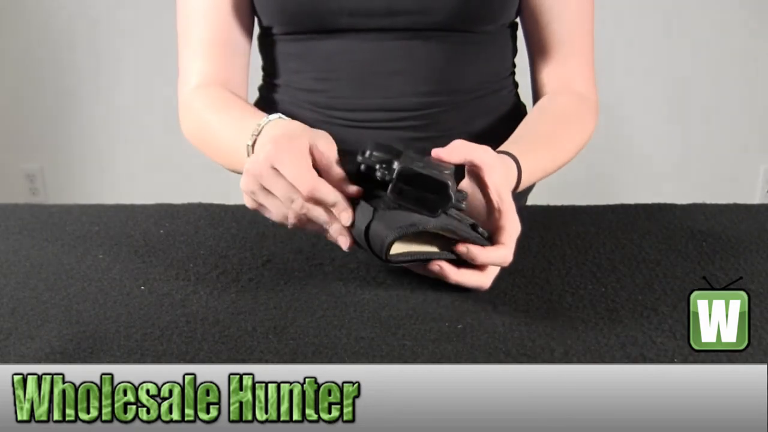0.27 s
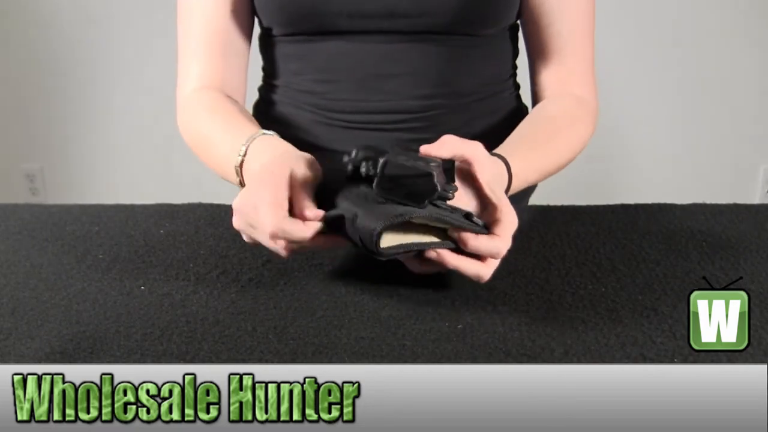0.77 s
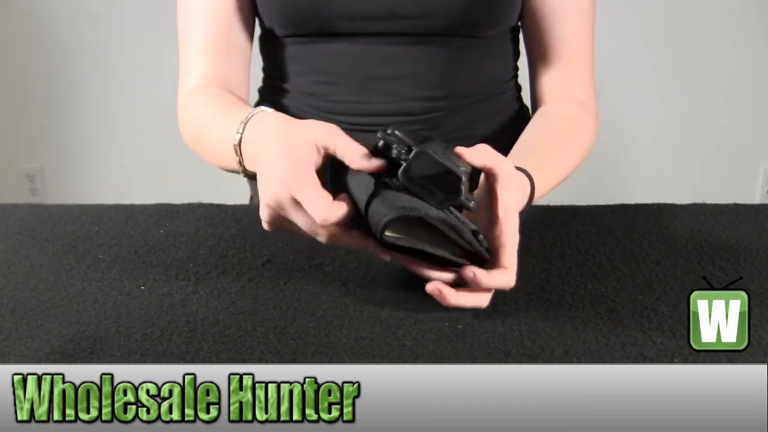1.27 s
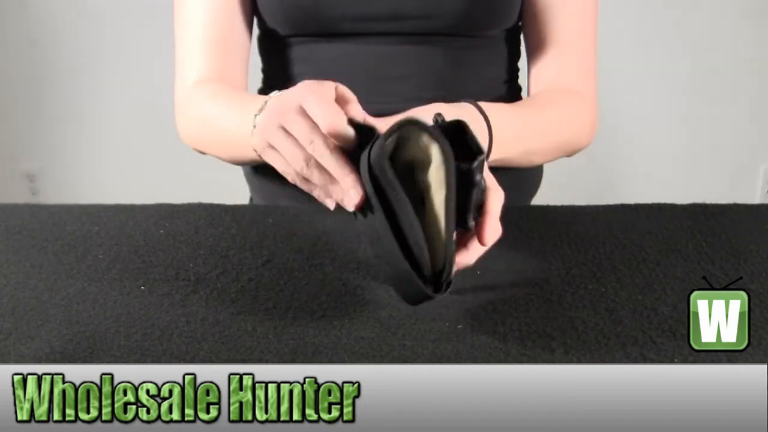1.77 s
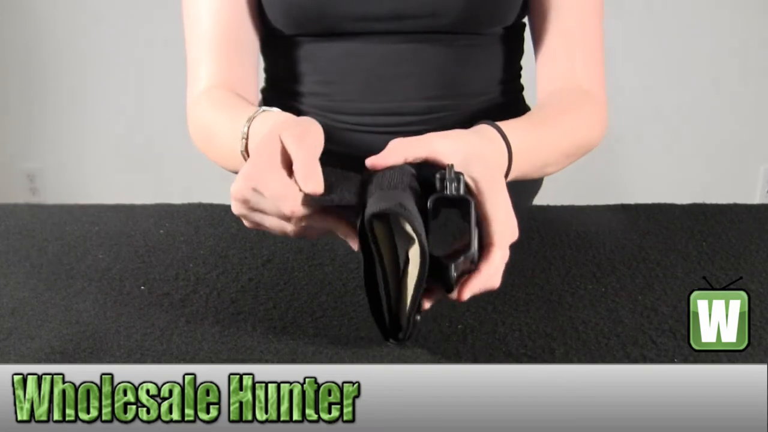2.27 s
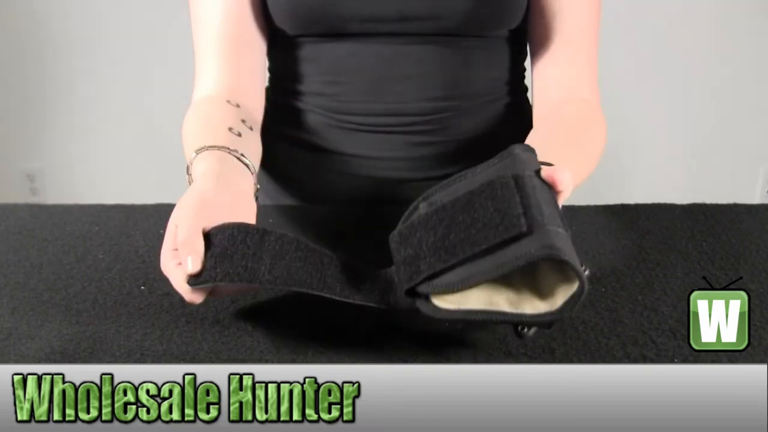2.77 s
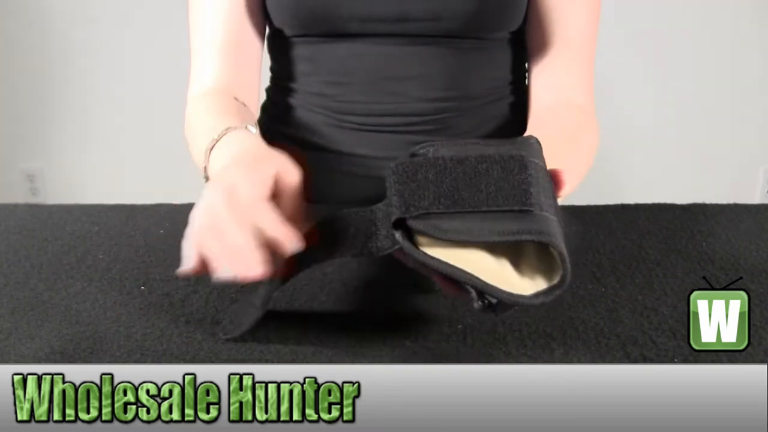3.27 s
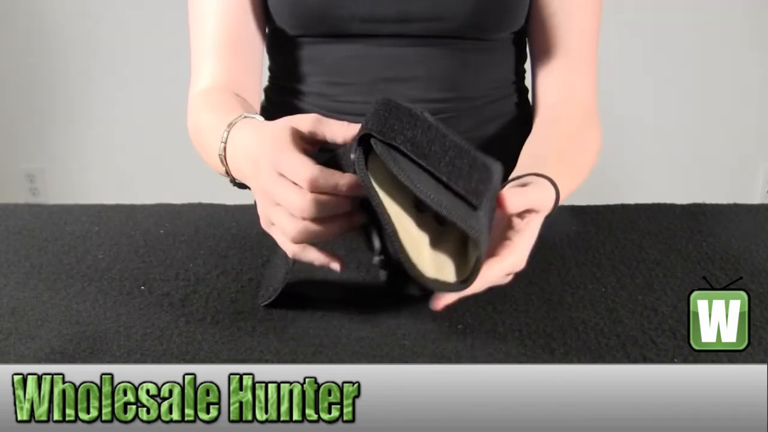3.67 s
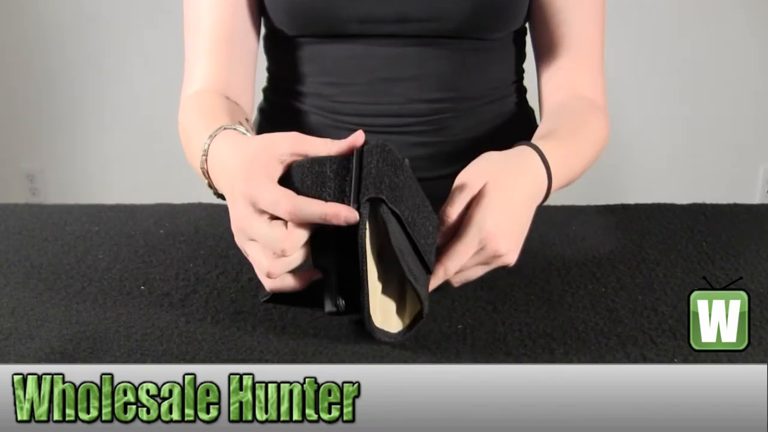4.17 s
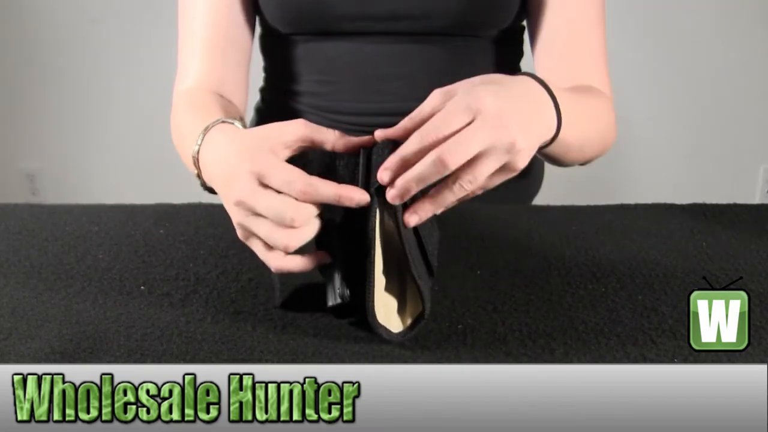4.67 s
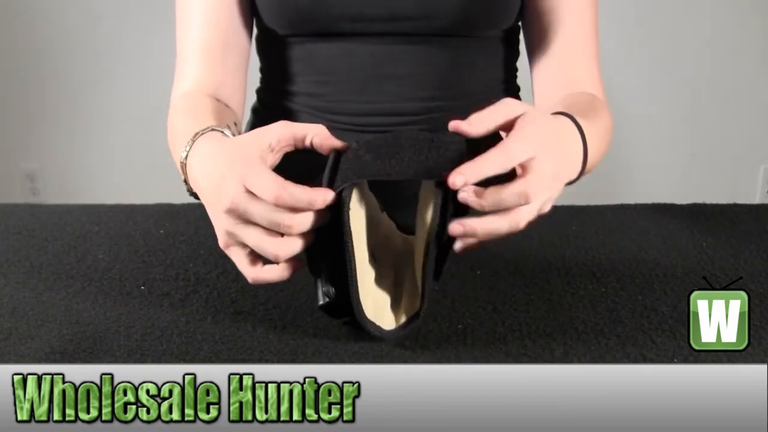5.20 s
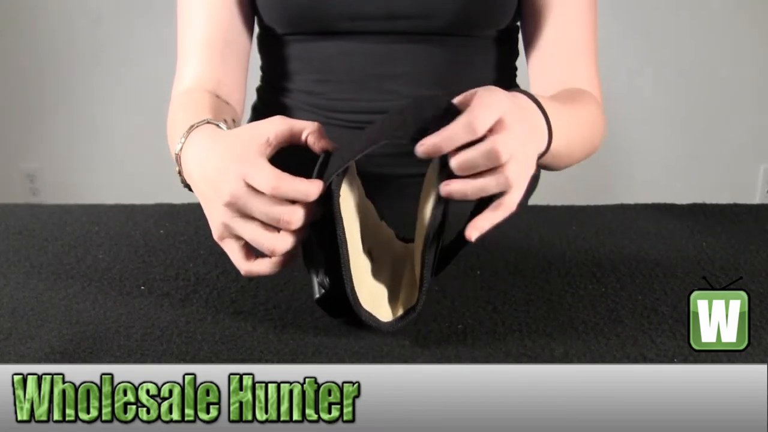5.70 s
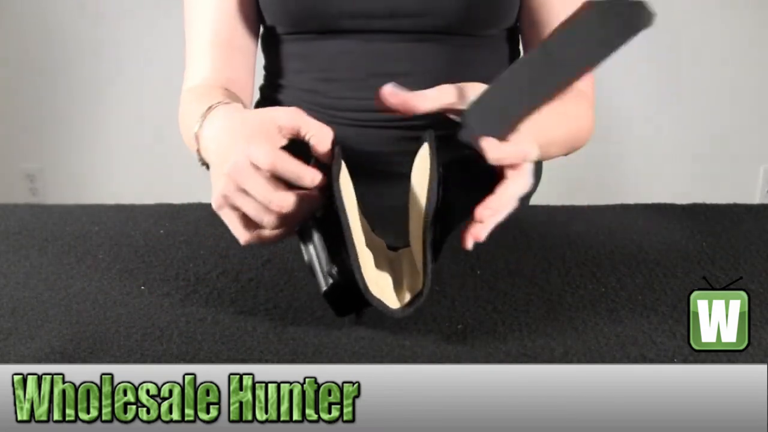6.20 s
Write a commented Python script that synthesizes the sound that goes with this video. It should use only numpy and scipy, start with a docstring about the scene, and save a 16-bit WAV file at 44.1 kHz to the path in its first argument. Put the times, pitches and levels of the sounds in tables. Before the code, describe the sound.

In a small bare room, fabric fastening rips open in two crisp bursts, followed by soft handling, plastic clacks and two raspy strap pulls.

```python
"""Peeling a hook-and-loop strap

Hands open a padded fabric brace over a table in a small, bare room. Its strap is peeled in two pulls:
single hooks and whole patches let go as short bursts of coloured noise. The brace is turned over: cloth
rustles as swelling noise, padding bumps, and plastic fittings knock with dying sine tones. The strap is drawn
out through its ring in two strokes of rasping, hissing noise, while the table booms on one low wavering tone."""
import sys
import numpy as np
from scipy import signal
from scipy.fft import rfft, irfft, next_fast_len
from scipy.io import wavfile
from scipy.ndimage import map_coordinates

SR = 44100
rng = np.random.default_rng(int(sys.argv[2]) if len(sys.argv) > 2 else 0)


def unload_audio(sound):
    """Save the sound as a 16-bit wav file, at the path given as the first command line argument."""
    columns = np.transpose(np.atleast_2d(sound))
    # keep every value between -1 and 1, then stretch to whole-number steps
    steps = np.round(np.clip(columns, -1, 1) * 32767)
    wavfile.write(sys.argv[1], SR, steps.astype(np.int16))


N = 284180  # length of the scene in samples

# Hands sliding on the cloth. Each row: start in seconds, length in seconds,
# relative level of the dull rub in dB, relative level of the light brush in dB.
SLIDES = [(0.0, 0.1, -46.5, -35.5), (0.158, 0.13, -43.5, -47.5), (0.294, 0.088, -44, -31.5),
          (0.448, 0.055, -32, -35.5), (1.303, 0.048, -52.5, -43.5), (1.378, 0.097, -38, -40),
          (1.481, 0.05, -32, -33), (1.673, 0.1, -44, -61), (1.913, 0.0564, -41.5, -60),
          (3.195, 0.15, -40, -39), (3.388, 0.06, -40, -39), (3.489, 0.39, -45, -49.5),
          (3.627, 0.26, -39, -43.5), (3.883, 0.093, -33.5, -40.5), (3.993, 0.38, -43, -49),
          (4.181, 0.3, -43, -53.5), (4.396, 0.065, -39.5, -40.5), (4.58, 0.034, -39.5, -45.5),
          (4.617, 0.33, -39, -49), (5.445, 0.19, -48.5, -72), (6.081, 0.04, -57, -33.5),
          (6.162, 0.071, -32.5, -45.5), (6.308, 0.24, -39.5, -43.5)]
# Colour of a hard little click. Each row: frequency in Hz, level in dB.
CLICK_COLOUR = [(300, -5.5), (600, 1.5), (900, -5), (1300, 0), (1800, -2), (2400, -5.5), (3100, -4),
                (4200, -14.5), (5800, -10.5), (10000, -20)]


def snaps():
    """Single sharp snaps of hooks, most during the pulls, a few faint ones before and after."""
    # Each row: time in seconds, energy of the tick in dB, energy of the fabric's body in dB.
    single_hooks = [(0.201, -10.5, -15), (0.3752, -8.5, -11.5), (0.5742, -2.5, -7), (0.6286, 4.5, 3),
                    (0.647, 1.5, 3), (0.6603, 4.5, 2), (0.6647, 5, 1), (0.6725, 6, 1.5), (0.6804, -3.5, 1),
                    (0.687, 1, -3), (0.758, 6, 4), (0.7613, 3, -5), (0.7794, -7, 4), (0.7937, 4, 1),
                    (0.8199, 5, 2.5), (0.8278, 3, 3.5), (0.8657, 6, 5.5), (0.9356, 5, 7.5),
                    (0.9615, -16, 8), (1.494, -15, 2.5), (1.505, -14, -1), (1.5263, 0.5, 7),
                    (1.5373, -0.5, 4.5), (1.5527, 5, 5.5), (1.6434, 1.5, 2), (1.8088, 0, 5.5),
                    (1.8119, 6, 5), (1.9392, -14.5, -13), (2.0094, 1, 2.5), (2.0264, 0, 3.5),
                    (2.032, 1, 6.5), (2.1388, 3.5, 10.5), (2.162, 5, 3), (2.2549, 3.5, -1), (2.3164, 8, -4),
                    (2.322, 2.5, -11), (2.4076, -9, 0), (2.442, -1, 2.5), (2.4543, 11, -2), (2.526, 0, 4.5),
                    (3.859, -18, -13), (4.3605, -11.5, -13), (6.119, -7, -15.5)]
    times, tick_db, body_db = np.transpose(single_hooks)
    return hooks(times, amp(tick_db), amp(body_db))


def tears(hooks_per_second=300, spread_db=1.0, growth_db=1.0):
    """Each hook that lets go overloads its neighbours, so a patch goes in one slightly growing rush."""
    # Each row: start in seconds, length in seconds, level of the ticks in dB, level of the body in dB.
    patches = [(0.705, 0.014, -17, -18.5), (0.827, 0.019, -14, -15.5), (0.872, 0.02, -17, -19),
               (0.897, 0.041, -19.5, -19), (0.944, 0.028, -27, -26), (1.029, 0.01116, -24, -20),
               (2.126, 0.0076, -20.5, -20.5), (2.143, 0.014, -17.5, -16), (2.178, 0.018, -21.5, -19),
               (2.207, 0.032, -19, -19), (2.278, 0.012, -24, -22), (2.286, 0.018, -17, -17),
               (2.364, 0.0096, -18.5, -18), (2.426, 0.0086, -19, -21.5), (2.457, 0.07, -20.5, -20.5)]
    rows = []
    for start, length, tick_db, body_db in patches:
        count = max(2, round(length * hooks_per_second))
        progress = (np.arange(count) + rng.uniform(0, .8, count)) / count
        uneven = amp(spread_db * rng.standard_normal(count) + growth_db * progress)
        # longer patches hold more energy, shared out among their hooks
        share = unit(uneven) * np.sqrt(length * SR / count)
        rows.append([start + length * progress, share * amp(tick_db), share * amp(body_db)])
    return hooks(*np.hstack(rows))


def strays(strays_per_second=70, spread_db=5.5, body_db=0.5):
    """Weaker hooks let go at random all along the peeling edge."""
    # Pulls on the strap. Each row: start in seconds, end in seconds, typical energy of a hook's tick in dB.
    pulls = [(0.5, 0.541, -20), (0.758, 0.996, -9.5), (1.497, 1.594, -12.5), (2.151, 2.519, -8.5)]
    rows = []
    for start, end, db in pulls:
        count = max(2, round((end - start) * strays_per_second))
        progress = (np.arange(count) + rng.random(count)) / count
        sizes = amp(db + spread_db * rng.standard_normal(count))
        rows.append([start + (end - start) * progress, sizes])
    times, sizes = np.hstack(rows)
    return hooks(times, sizes, sizes * amp(body_db))


def hooks(times, tick, body):
    """A freed hook ticks sharply, and the fabric behind it springs back, higher in pitch when taut."""
    # How taut the strap is held. Each row: time in seconds, tautness from 0 to 1.
    tension = [(0, 0.21), (1.9, 0), (2.12, 0.78), (2.35, 1), (2.45, 0.44), (2.6, 0.9)]
    # Colours of the tick, the slack fabric and the taut fabric. Each row: frequency in Hz, level in dB.
    tick_colour = [(1500, -34), (3200, -11.5), (4300, -20), (5300, 2), (7000, -4), (8800, 2.5), (10500, 0),
                   (12500, -22)]
    slack_colour = [(40, -24), (170, -24), (500, -3.5), (750, 2.5), (1000, -1.5), (1550, 4), (2100, -2.5),
                    (2600, 0.5), (3300, 3), (4200, -12), (7000, -6)]
    taut_colour = [(40, -27), (170, -15), (500, -11), (850, -2.5), (1550, 0), (1800, -4), (2200, 1.5),
                   (2600, -5), (3200, 0), (4200, -11), (7000, -47)]
    taut = np.clip(np.interp(times, *np.transpose(tension)), 0, 1)
    ticks = bursts(times, tick, tick_colour, life=0.0006, vary=0.06)
    slack_fabric = bursts(times, body * np.sqrt(1 - taut), slack_colour, life=0.0023, vary=0.018)
    taut_fabric = bursts(times, body * np.sqrt(taut), taut_colour, life=0.0023, vary=0.018)
    return high_pass(ticks, corner_hz=1480) + high_pass(slack_fabric + taut_fabric, corner_hz=284)


def strap():
    """The weave rasps and hisses over the ring, both as strongly as it is pulled."""
    # One list for each stroke. Each row: time in seconds, strength of the pull in dB.
    strokes = [
        [(4.885, -48), (4.91, -29.5), (5.01, -26.5), (5.075, -17.5), (5.15, -23.5), (5.236, -17.5),
         (5.31, -32.5), (5.37, -29), (5.46, -69)],
        [(5.57, -62), (5.59, -31), (5.656, -25.5), (5.816, -21.5), (5.868, -26), (5.916, -17), (5.954, -35.5),
         (6.05, -63)],
    ]
    # Hiss of the weave relative to the pull, one value in dB for each stroke.
    hiss_db = [-9, -7]
    # Colours of the rasp and the hiss. Each row: frequency in Hz, level in dB.
    rasp_colour = [(71, -45), (120, -19.5), (160, -20.5), (228, -18), (394, -7.5), (569, -6.5), (673, -2.5),
                   (833, 0.5), (913, -7), (1420, -3.5), (1790, -5), (1960, -10), (3190, -5.5),
                   (4260, -19.5), (4600, -27.5), (5980, -45.5), (10100, -120)]
    hiss_colour = [(1500, -60), (3500, -25), (4600, -2.5), (5500, 3.5), (7400, -1.5), (9300, 0),
                   (11000, -1)]
    t = np.arange(N) / SR
    pull_db = [np.interp(t, *np.transpose(rows), left=-120, right=-120) for rows in strokes]
    pulls = amp(np.array(pull_db))
    rasp = amp(-5.0) * pulls.sum(axis=0) * friction(rasp_colour, grain_db=2.0)
    hiss = amp(hiss_db) @ pulls * friction(hiss_colour, grain_db=3.0)
    drag = amp(2.6 * wobble(70))  # the drag flutters
    return drag * (rasp + hiss)


def knocks(ring_t60=0.041, rise=0.00079, upper=1.11):
    """A fitting clacks and two close modes of the hollow plastic ring briefly."""
    # Each row: time in seconds, level in dB, pitch of the hollow ring in Hz, clack relative to the ring in dB.
    fittings = [(0.236, -29.5, 790, -15), (0.476, -26, 801, -13), (1.311, -36, 510, 3),
                (1.466, -22.5, 813.4, -6), (2.982, -23.5, 620, -1.5), (3.737, -24, 570, 2),
                (3.807, -36.5, 626, 8.5), (3.967, -16, 687, -12.5), (3.984, -23.5, 739, -9),
                (4.777, -39, 903, 8.5), (5.523, -43.5, 676, 5.5), (5.913, -5, 706, -26),
                (5.92, -17, 765, -1.5), (6.119, -18.5, 648, -1.5), (6.306, -22, 678, -16.5),
                (6.4, -21.5, 690, -9)]
    times, ring_db, pitch_hz, clack_db = np.transpose(fittings)
    rings = np.zeros(N + SR)
    t = np.arange(SR // 5) / SR
    envelope = amp(-60 * t / ring_t60) * (1 - np.exp(-t / rise))
    for start, db, hz in zip(times, ring_db, pitch_hz):
        modes = np.sin(2 * np.pi * hz * t) + amp(-7) * np.sin(2 * np.pi * hz * upper * t)
        rings[round(start * SR):][:len(t)] += amp(db) * modes * envelope
    # 22 dB turns a level into the energy of a burst
    clacks = bursts(times, amp(ring_db + clack_db + 22), CLICK_COLOUR, life=0.0048, vary=0.023)
    return high_pass(rings[:N] + clacks, corner_hz=260)


def handling(rise=0.23, fade=0.59):
    """Palms rub the padding and fingers brush the nylon."""
    # Colours of the dull rub and the light brush. Each row: frequency in Hz, level in dB.
    rub_colour = [(53, -51), (90, -17), (215, -8.5), (423, -3.5), (460, 0), (538, -5), (664, 3), (1170, -1),
                  (1340, -7), (1570, -0.5), (2600, -15), (3380, -17), (5720, -120)]
    brush_colour = [(200, -64), (900, -1.5), (1800, -5), (2600, -0.5), (3300, 3), (4250, -15), (5400, -2.5),
                    (7200, -7.5), (9000, -4), (11000, -6.5)]
    rub, brush = sum(amp([[rub_db], [brush_db]]) * swell(start, length, rise, fade)
                     for start, length, rub_db, brush_db in SLIDES)
    grip = amp(2.44 * wobble(45))  # the grip varies
    rubbing = amp(-4.5) * rub * friction(rub_colour, grain_db=5.5)
    brushing = amp(-0.5) * brush * friction(brush_colour, grain_db=3.5)
    return grip * (rubbing + brushing)


def creases(creases_per_second=15, over_brush_db=23, spread_db=3.5):
    """Stiff nylon ticks faintly as it bends under the sliding fingers."""
    rows = []
    for start, length, rub_db, brush_db in SLIDES:
        count = int(np.ceil(length * creases_per_second))
        times = start + length * rng.uniform(.1, .8, count)
        sizes = amp(brush_db + over_brush_db + spread_db * rng.standard_normal(count))
        rows.append([times, sizes])
    times, sizes = np.hstack(rows)
    return high_pass(bursts(times, sizes, CLICK_COLOUR, life=0.0019, vary=0.23), corner_hz=500)


def bumps():
    """Padding meets the table: a dull push with no ring."""
    # Each row: time in seconds, relative level in dB.
    soft_hits = [(1.657, -26), (1.705, -28.5), (2.43, -22.5), (2.48, -24.5), (3.389, -33), (3.45, -35.5)]
    # Colour of the push. Each row: frequency in Hz, level in dB.
    thud_colour = [(50, -37), (110, -3.5), (170, -0.5), (280, -3.5), (600, -2), (1500, -62)]
    times, db = np.transpose(soft_hits)
    thuds = bursts(times, amp(db + 14), thud_colour, life=0.027, vary=0.099, size=4096)
    return high_pass(thuds, corner_hz=70)


def table(boom_hz=99, rise=0.25, fade=0.86):
    """The table's lowest mode, stirred unevenly by the brace pressed on it."""
    # The brace pressed along the table top. Each row: start in seconds, length in seconds, relative level in dB.
    presses = [(4.4, 0.22, -59), (4.888, 0.26, -44), (5.05, 0.27, -51), (5.604, 0.17, -50),
               (5.74, 0.27, -53), (5.908, 0.43, -56.5)]
    phase = 2 * np.pi * boom_hz * np.arange(N) / SR + 0.87 * wobble(9)
    pressure = sum(amp(db) * swell(start, length, rise, fade) for start, length, db in presses)
    unevenness = amp(3.0 + 2.2 * wobble(16))
    return unevenness * pressure * unit(np.sin(phase))


def room(x, wet_db=-2.5, count=20):
    """The echo is made of equal blocks, each with a fresh random tail; it is mostly alike on both sides."""
    # How far left and right differ. Each row: frequency in Hz, side relative to mid in dB.
    width = [(120, -6), (600, -28.5), (2000, -26), (5000, -12), (10000, -8)]
    out = np.zeros((2, N + 2 * SR))
    step = N // count + 1
    for start in range(0, N, step):
        echo = signal.fftconvolve(x[None, start:start + step], tail(gap=0.002, build=0.004), axes=1)
        out[:, start:start + echo.shape[1]] += echo
    mid, side = amp(wet_db) * out[:, :N]
    side = filtered(side, lambda hz: amp(along(width, hz)))
    return np.array([mid + side, mid - side])


def tail(gap, build, early_db=2.5, early_s=0.012):
    """One answer of the walls as (mid, side): it builds after a short gap, then each pitch dies at its own pace."""
    # How fast the echo dies. Each row: frequency in Hz, time to fall by 60 dB in seconds.
    decay = [(200, 0.99), (530, 0.42), (1400, 0.49), (2400, 0.55), (4500, 0.53), (9700, 0.29)]
    # Strength of the room's answer. Each row: frequency in Hz, level in dB.
    answer = [(100, -8.5), (500, 4), (1200, -0.5), (2400, -0.5), (3300, -3.5), (4300, 1), (5400, -5),
              (10000, -6)]
    noise = rng.standard_normal((2, SR * 3 // 4))
    hz, t, z = signal.stft(noise, SR, nperseg=256)
    echo = signal.istft(z * amp(-60 * t / along(decay, hz)[:, None]), SR, nperseg=256)[1]
    age = np.arange(echo.shape[1]) / SR
    onset = np.clip((age - gap) / build, 0, 1)
    near_walls = amp(early_db * np.exp(-age / early_s))  # the earliest echoes are stronger
    echo *= onset * near_walls
    return filtered(unit(echo) / np.sqrt(echo.shape[1]), lambda f: amp(along(answer, f)))


def still_air():
    """Steady soft noise: one part shared by both sides and a fainter part of each side's own."""
    # Colour of the air. Each row: frequency in Hz, level in dB.
    air_colour = [(15, -48), (25, -15), (48, -19.5), (189, -7), (256, -7), (290, -5), (435, -4.5),
                  (2490, -11), (3820, -13.5), (4230, -17), (10500, -20), (13600, -76), (22000, -120)]
    shared = amp(-48.5) * friction(air_colour, grain_db=3)
    separate = amp(-64.0) * np.array([friction(air_colour, grain_db=4.0) for side in 'LR'])
    return high_pass(shared + separate, corner_hz=70, order=1)


def friction(spectrum, grain_db):
    """Noise made of countless small slips of uneven size, coloured, rms 1."""
    sizes = amp(grain_db * np.repeat(rng.standard_normal(N // 32 + 1), 32)[:N])
    return unit(filtered(sizes * rng.standard_normal(N), lambda hz: amp(along(spectrum, hz))))


def bursts(times, sizes, spectrum, life, vary, size=1024):
    """Short dying bursts of energy sizes squared, each with its colour shifted a little."""
    lead = size // 8  # room left ahead of each burst
    t = np.maximum(np.arange(size) - lead, 0) / SR
    hz = np.fft.rfftfreq(size, 1 / SR)
    shift = np.exp(vary * rng.standard_normal((len(times), 1)))
    colour = amp(along(spectrum, hz * shift))
    envelope = np.exp(-t / life) * (1 - np.exp(-t / .00005))
    blow = rfft(rng.standard_normal((len(times), size)) * envelope)
    # partly evens out the noise spectrum, so each burst keeps close to its colour
    blow = blow / (np.abs(blow) + 1e-9) ** 0.32
    rows = unit(irfft(blow * colour)) * sizes[:, None] / np.sqrt(size)
    at = np.round(times * SR).astype(int)[:, None] - lead + np.arange(size)
    return np.bincount(at.ravel(), rows.ravel(), N)[:N]


def swell(start, length, rise, fade):
    """Gain of one hand movement: it speeds up for a share (rise) of its length, then slows to rest."""
    progress = (np.arange(N) / SR - start) / length
    return np.interp(progress, [0, rise, 1], [0, 1, 0]) ** fade  # the power fade rounds the shape


def wobble(rate):
    """A smooth random curve, rate knots a second."""
    knots = rng.standard_normal(int(N * rate / SR) + 4)
    return map_coordinates(knots, [np.arange(N) * rate / SR])


def high_pass(x, corner_hz, order=3):
    """Takes away the bass below the corner."""
    return signal.sosfilt(signal.butter(order, corner_hz, 'high', fs=SR, output='sos'), x)


def filtered(x, response):
    """x with each frequency scaled by the given response."""
    m = next_fast_len(x.shape[-1] + 8192)
    return irfft(rfft(x, m) * response(np.fft.rfftfreq(m, 1 / SR)), m)[..., :x.shape[-1]]


def along(points, hz):
    """(Hz, value) points read on a log axis."""
    f, v = np.transpose(points)
    return np.interp(np.log(hz + 1), np.log(f + 1), v)


def unit(x):
    """Each row scaled to rms 1."""
    return x / np.sqrt(np.mean(x ** 2, axis=-1, keepdims=True) + 1e-20)


def amp(db):
    """Decibels to gain."""
    return 10 ** (np.asarray(db) / 20)


def scene():
    """The brace in front of the microphone, the table, the room and its still air."""
    peeling = snaps() + tears() + strays()
    fabric = peeling + handling() + creases() + strap() + bumps()
    fittings = knocks()
    echoes = room(fabric + .5 * fittings)
    return fabric + fittings + echoes + table() + still_air()


def record(dry, top_hz=10450):
    """The sharpest peaks are rounded off, and the sound is cut steeply above the band limit."""
    rounded = dry / (1 + np.abs(dry / .72) ** 4) ** (1 / 4)
    # 1 dB less for every 9 Hz above the limit, down to -120 dB
    return filtered(rounded, lambda hz: amp(-np.clip((hz - top_hz) / 9, 0, 120)))


dry = scene()
out = record(dry)
unload_audio(out)
```